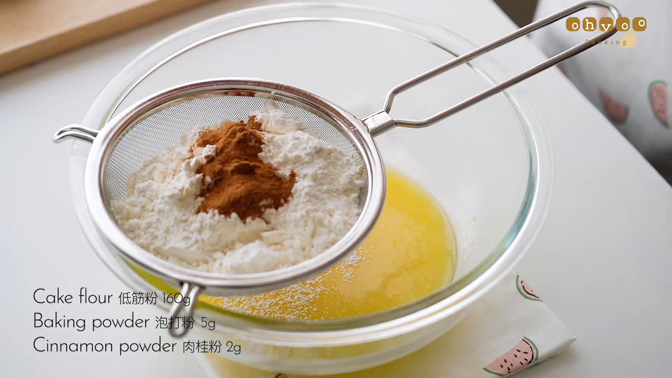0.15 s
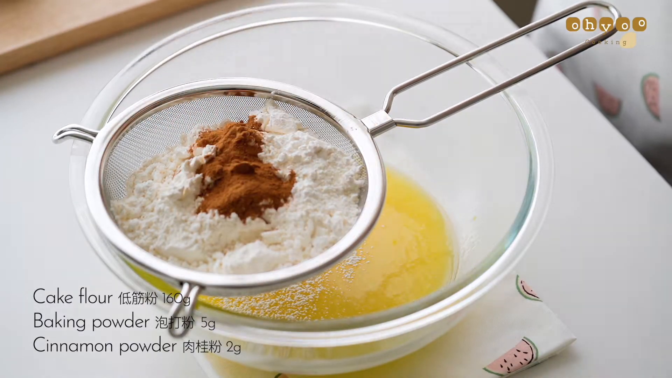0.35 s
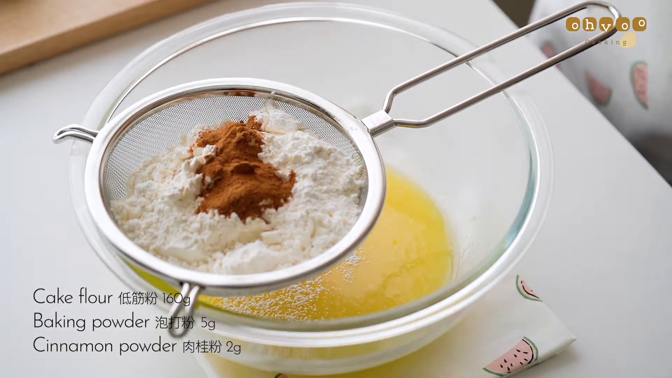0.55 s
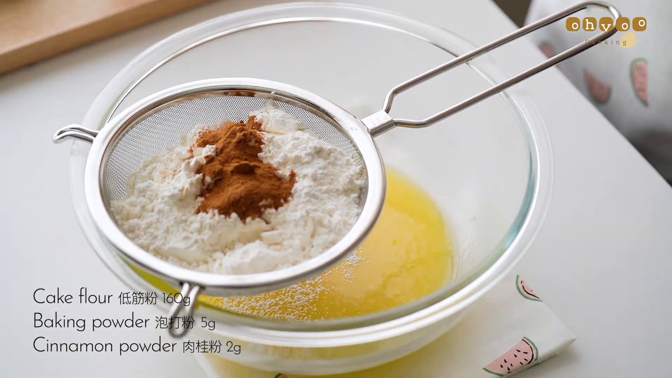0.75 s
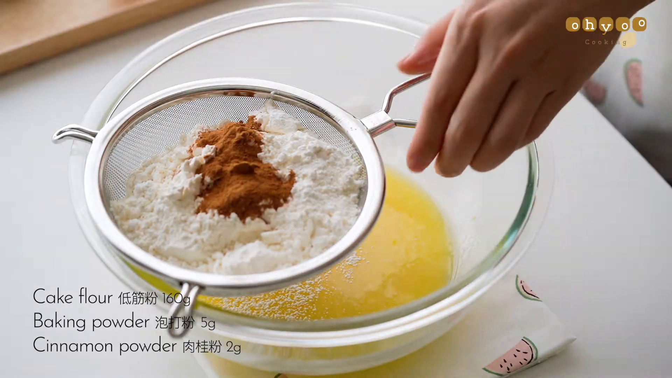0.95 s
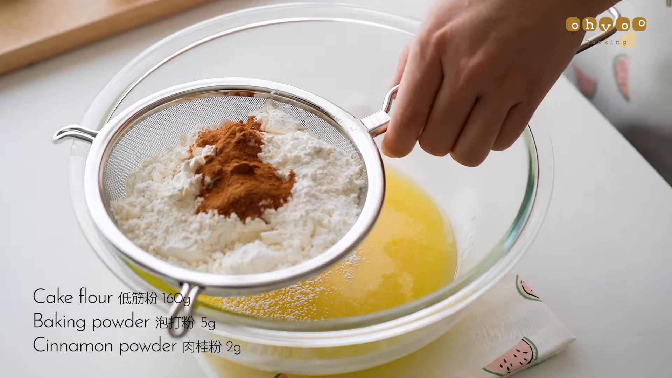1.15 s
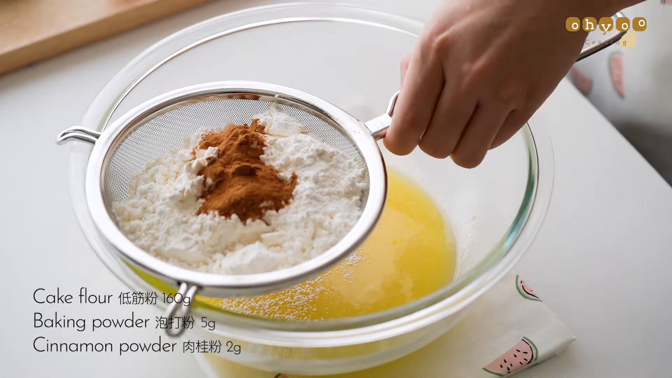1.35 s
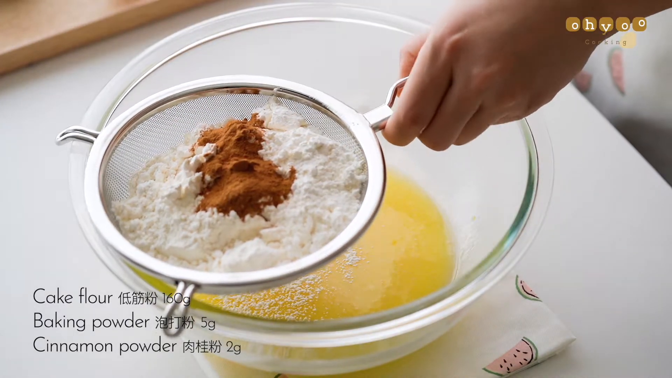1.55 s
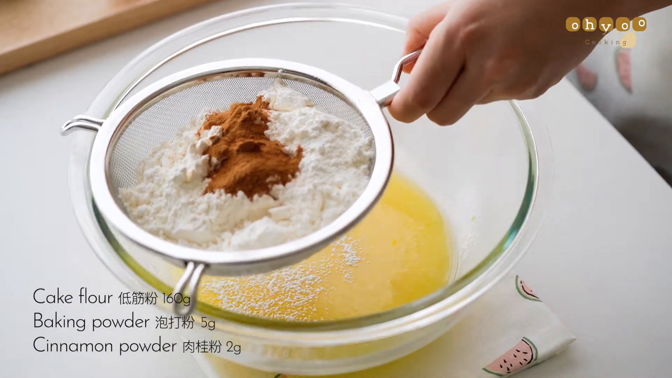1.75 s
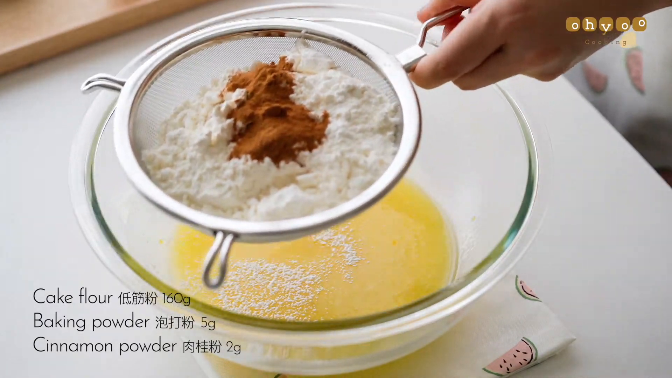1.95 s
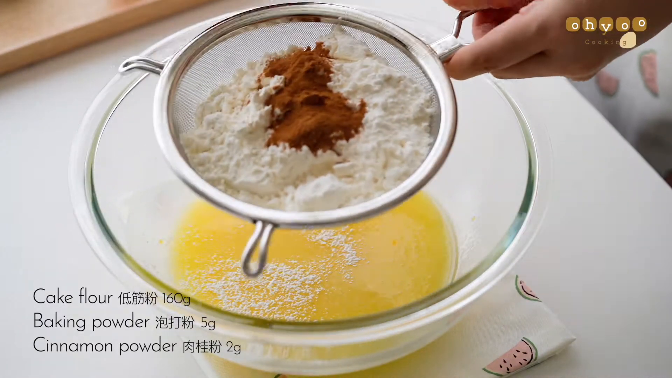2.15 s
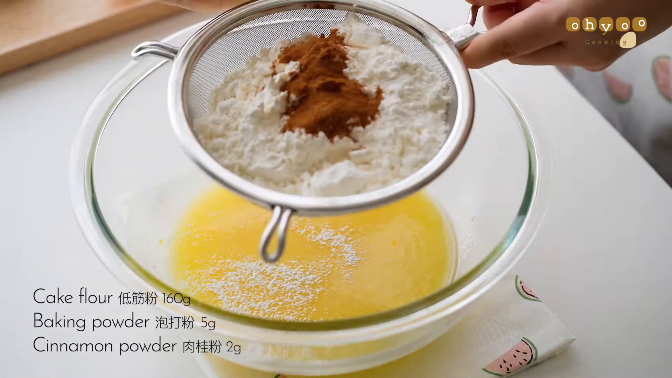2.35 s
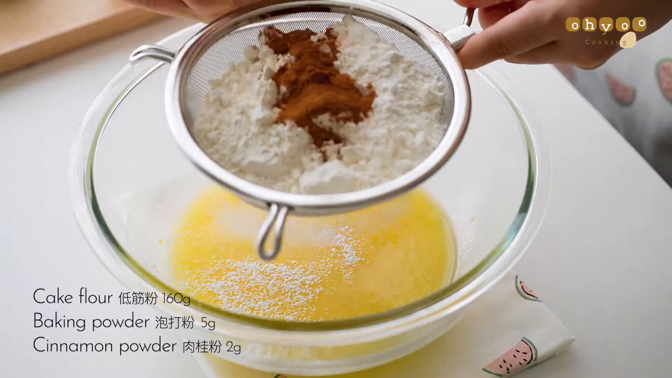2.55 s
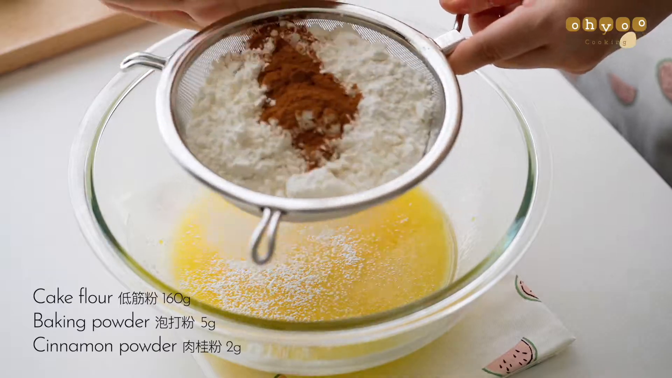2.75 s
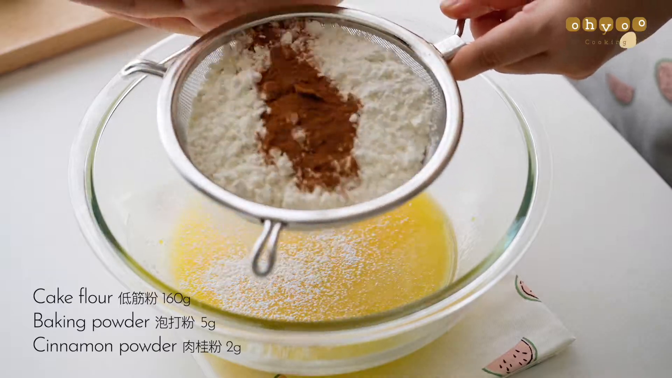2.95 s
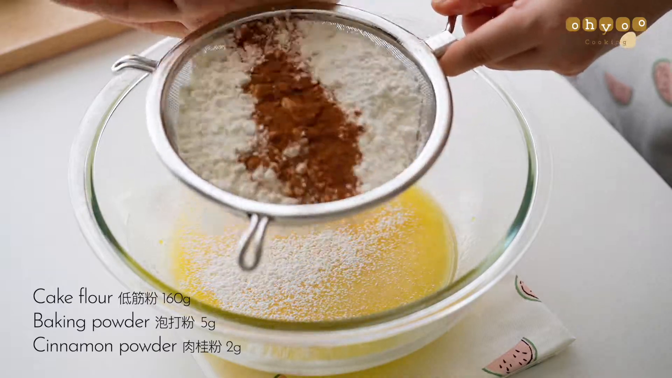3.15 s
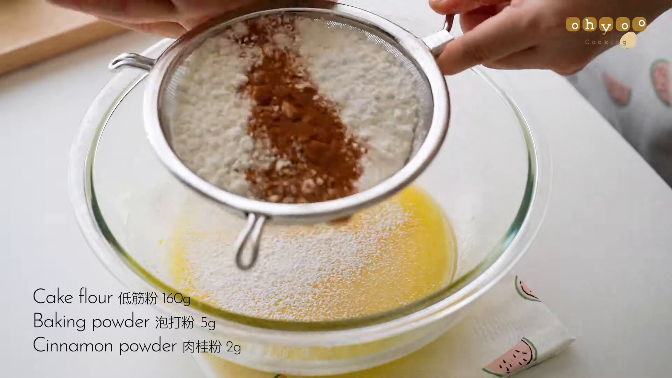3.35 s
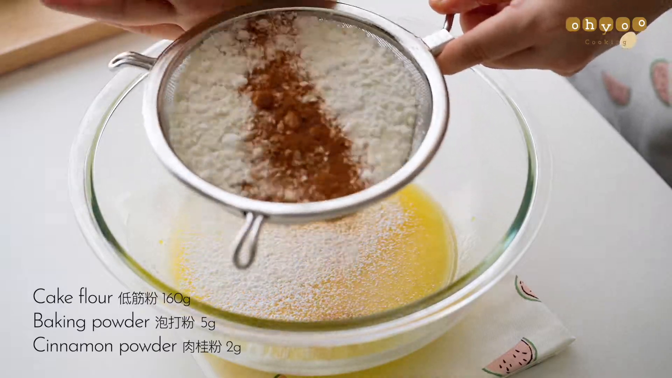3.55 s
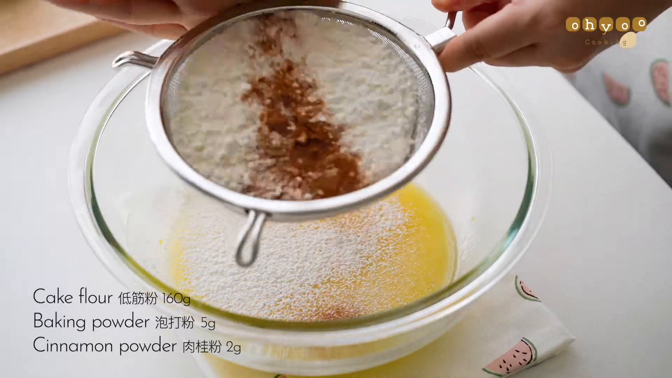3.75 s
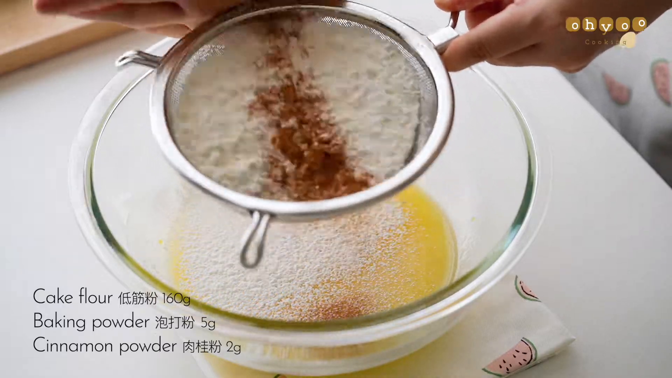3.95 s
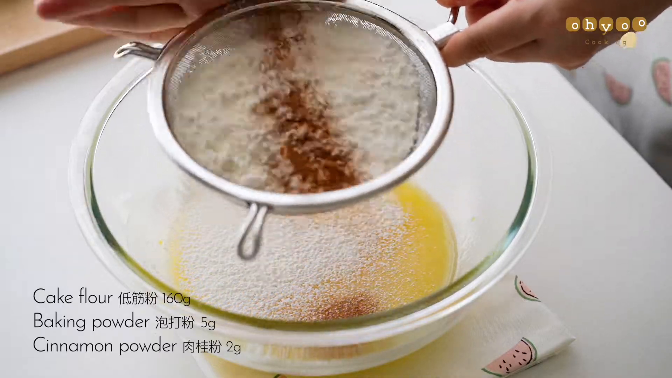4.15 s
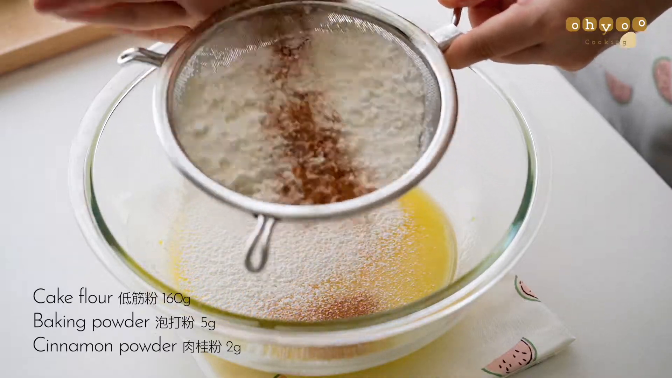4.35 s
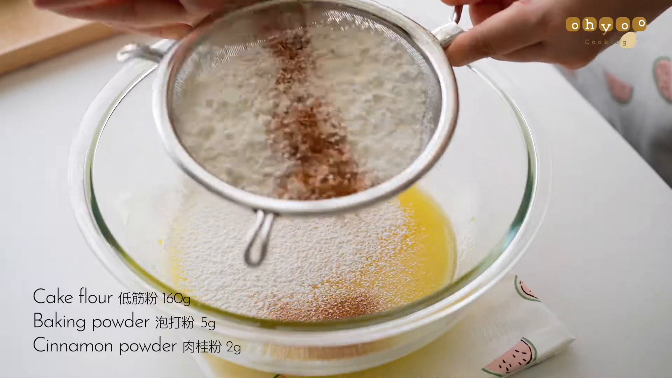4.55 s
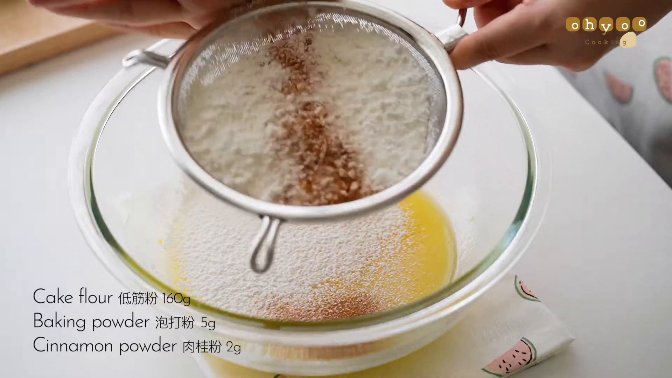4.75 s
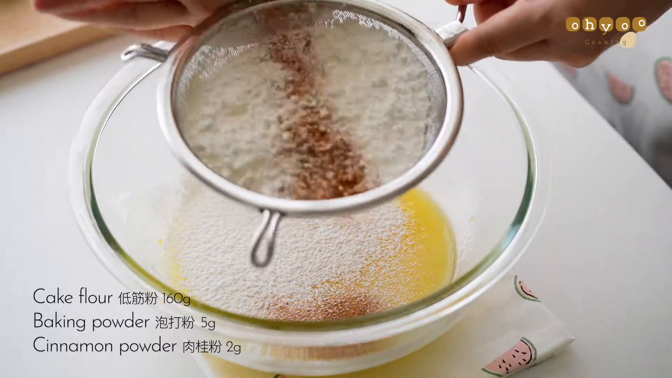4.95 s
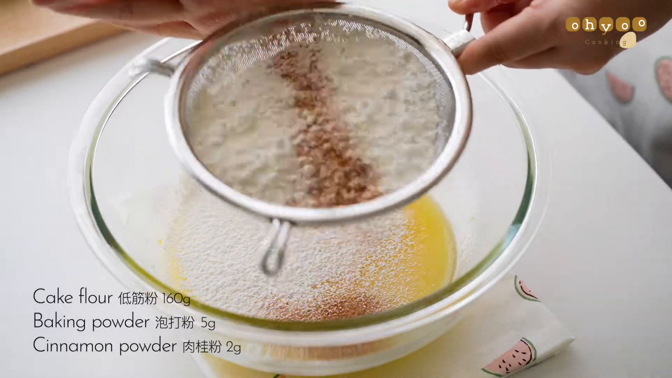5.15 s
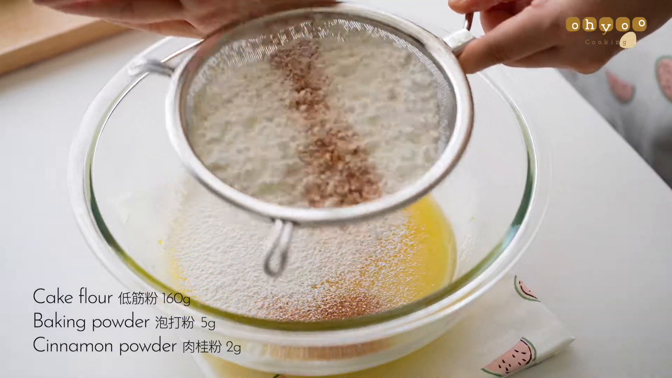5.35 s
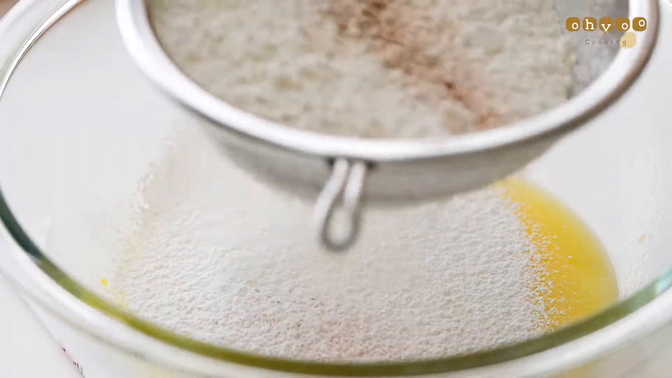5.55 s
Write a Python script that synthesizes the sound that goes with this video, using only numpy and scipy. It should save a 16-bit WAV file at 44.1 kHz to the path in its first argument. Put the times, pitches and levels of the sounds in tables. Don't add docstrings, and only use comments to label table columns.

```python
import sys
import numpy as np
from scipy import signal
from scipy.fft import rfft, irfft
from scipy.io import wavfile
from scipy.ndimage import uniform_filter1d

SR = 44100
rng = np.random.default_rng(int(sys.argv[2]) if len(sys.argv) > 2 else 0)


def rack_gain(trim_db):
    fader = np.asarray(trim_db, float)
    return 10 ** (fader / 20)


def persist_wave(psi):
    counts = np.round(np.clip(psi, -1, 1) * 32767).astype(np.int16)
    wavfile.write(sys.argv[1], SR, np.atleast_2d(counts).T)


N = 246959
T = np.arange(N) / SR

# [t/s, crack level/dB, rim ring level/dB, body knock level/dB, length/ms]
SLAPS = [(2.4663, -45, -73, -40.5, 3.2), (2.667, -48, -52, -45, 1.7), (2.8915, -44.5, -56, -40, 3.8),
         (3.093, -41.5, -45, -44.5, 9.5), (3.308, -40.5, -56, -59, 2.7), (3.5139, -44.5, -72, -41.5, 27),
         (3.7311, -39, -43, -44, 3), (3.9467, -33, -42, -41, 1.24), (4.1621, -41, -50, -35.5, 5.3),
         (4.3665, -46, -60, -46.5, 2.4), (4.5755, -38, -64, -32.5, 2.7), (4.7606, -50, -47, -42.5, 2.1),
         (4.967, -46.5, -58, -40, 2.8), (5.1805, -46, -63, -41.5, 5.2), (5.3847, -45, -60, -38.5, 15),
         (5.4255, -46, -53, -42.5, 3.3), (5.5463, -68, -51, -57, 2.7)]


def unit(x):
    return x / np.sqrt(np.mean(x ** 2))


def colour(x, points, lo_hz=0, hi_hz=SR):
    f = np.arange(1, len(x) // 2 + 2) * SR / len(x)
    hz, db = np.transpose(points)
    edges = 1 / (1 + (lo_hz / f) ** 6) / (1 + (f / hi_hz) ** 6)
    gain = rack_gain(np.interp(np.log(f), np.log(hz), db)) * edges
    return irfft(rfft(x) * gain, len(x))


def band(x, hz, q):
    return signal.lfilter(*signal.iirpeak(hz, q, SR), x)


def resonate(x, peaks):
    return sum(rack_gain(db) * unit(band(x, hz, hz / width)) for hz, width, db in peaks)


def walk(rate_hz):
    k = int(SR / rate_hz)
    held = np.repeat(rng.standard_normal(N // k + 1), k)[:N]
    return unit(uniform_filter1d(uniform_filter1d(held, k), k))


def add(out, s, x):
    i = int(s * SR)
    out[i:i + len(x)] += x[:max(N - i, 0)]


def decay(t60_s, t):
    return np.exp(-np.log(1000) * t / t60_s)


def ring(hz, t60_s, t):
    return np.sin(2 * np.pi * hz * t) * decay(t60_s, t)


def kitchen():
    # [t/s, appliance load/dB, nearness of moving hands/dB]
    room = [(0, 3.5, -2.5), (.22, -1, -2.5), (.41, 2, -4.5), (.46, 8, -0.5), (.585, 6.5, 0.5),
            (.61, 2.5, -4), (.97, -1.5, 3), (1.1, -2, -2), (1.4, 0.5, 3), (1.5, 6, 10), (1.558, -0.5, 4.5),
            (1.86, 1, -0.5), (2.1, -3, 2), (2.5, -2, -1), (3.5, 1.5, 1.5), (4.2, -2.5, 1.5), (4.7, 0.5, 1),
            (5.6, 1, 2.5)]
    # [f/Hz, level/dB per Hz]
    air_spectrum = [(15, -25.5), (25, -16), (80, -8.5), (145, 1.5), (223, 4), (277, -16.5), (317, -14.5),
                    (489, -21), (695, -30), (1190, -37.5), (1290, -32.5), (1650, -33.5), (4730, -41.5),
                    (7700, -55), (16000, -59)]
    # [f/Hz, level/dB per Hz]
    hiss_spectrum = [(4500, 0), (5500, -0.5), (7700, -0.5), (9500, -1), (11000, -9), (13000, -5.5),
                     (16000, -6.5)]
    # [f/Hz, width/Hz, level/dB]
    drone_peaks = [(172, 16, -3), (222, 11, 0), (260, 14, -4), (325, 25, -9)]
    # [f/Hz, width/Hz, level/dB]
    hum_peaks = [(79, 6, 0)]
    # [t/s, half length/s, level/dB]
    hum_swells = [
        (2.244, .2, 0),
        (3.122, 0.18, 4.5),
        (5.566, 0.15, 5.5),
    ]
    s, *columns = np.transpose(room)
    load_db, near_db = (np.interp(T, s, c) for c in columns)
    swell_db = sum(db * np.exp(-((T - at) / half) ** 2) for at, half, db in hum_swells)

    deep_db = -65 + 3.5 * walk(21)
    hum_db = -61 + .15 * load_db + swell_db + .89 * walk(12)
    drone_db = -57.5 + load_db + .7 * walk(14) + 1.7 * walk(22)
    air_db = -72 + near_db + .8 * walk(12) + 1.6 * walk(25.88)
    hiss_db = -78

    noise = rng.standard_normal((6, N))
    deep = unit(colour(noise[0], air_spectrum, hi_hz=59))
    hum_bed = unit(colour(noise[5], air_spectrum, lo_hz=60, hi_hz=130))
    hum = unit(resonate(noise[5], hum_peaks) + rack_gain(-3) * hum_bed)
    drone_bed = unit(colour(noise[1], air_spectrum, lo_hz=120, hi_hz=470))
    drone = unit(drone_bed + rack_gain(1.5) * unit(resonate(noise[2], drone_peaks)))
    drone = unit(colour(drone, [(380, 0), (480, -10), (700, -24), (1000, -50)]))
    air = unit(colour(noise[3], air_spectrum, lo_hz=467, hi_hz=4610))
    hiss = unit(colour(noise[4], hiss_spectrum, lo_hz=4650))
    low = deep * rack_gain(deep_db) + hum * rack_gain(hum_db) + drone * rack_gain(drone_db)
    return low + air * rack_gain(air_db) + hiss * rack_gain(hiss_db)


def cup_squeaks():
    # [f/Hz, level/dB]
    partials = [(1080, -3), (5090, -16), (8690, -5), (9630, -4.5), (12700, -10)]
    # [t/s, half length/ms, level/dB]
    squeezes = [
        (.05, 8, -74),
        (.066, 12, -74),
        (.17, 12, -84),
        (.207, 5.5, -73),
    ]
    out, t = np.zeros(N), T[:SR // 3]
    chance = rng.standard_normal((len(squeezes), len(partials)))
    for (s, half_ms, db), spot in zip(squeezes, chance):
        tones = sum(rack_gain(m_db + 2.5 * c) * np.sin(2 * np.pi * hz * t + c)
                    for (hz, m_db), c in zip(partials, spot))
        add(out, 0, rack_gain(db) * tones * np.exp(-((t - s) * 1000 / half_ms) ** 2))
    return out


def contacts():
    # [t/s, crack level/dB, rim
    # ring level/dB, body knock level/dB, length/ms]
    grips = [(0.248, -68, -53, -79, 3.8), (0.7785, -46.5, -54, -52, 1.03), (0.058, -76, -62, -72, 4),
             (0.853, -70, -57, -50, 3), (0.9272, -45.5, -51, -51, 2.1), (0.9957, -68.5, -46, -67, 2.7),
             (1.3124, -67, -63, -63, 3.6), (1.3468, -55.5, -49.5, -44, 24), (1.3715, -57, -51, -52, 3.5),
             (1.4868, -39.5, -42, -28.5, 3.3), (1.4969, -50, -52, -44, 1.1), (1.52, -51, -62, -48, 2.9),
             (1.5651, -59, -55, -36.5, 3.3), (1.904, -65, -79, -53.5, 2.4), (5.395, -44, -42, -43.5, 1.5)]
    # [t/s, crack level/dB, rim ring level/dB, body knock level/dB]
    rattles = [(2.743, -58, -61, -55), (4.022, -71, -62, -72), (2.949, -52, -55, -48.5),
               (2.957, -59, -53, -74), (3.5982, -69, -60, -55), (3.7074, -60, -69, -52),
               (3.774, -66, -59, -53), (3.9017, -46.5, -37, -35.5), (3.989, -49, -51, -54),
               (4.1256, -47.5, -41, -45), (4.202, -51, -49, -47.5), (4.229, -71, -49, -47.5),
               (4.337, -47.5, -52, -46), (4.35, -43, -46, -48), (4.514, -55, -68, -51),
               (4.815, -50, -67, -55), (4.9369, -52, -46.5, -49), (5.015, -54, -78, -57),
               (5.136, -39, -41, -42), (5.2514, -83, -72, -65), (5.3423, -43.5, -44, -46.5),
               (5.5777, -64, -52, -44)]
    rows = [(*r[:4], r[1] - 34, r[4]) for r in grips]
    for s, crack_db, rim_db, body_db, length_ms in SLAPS:
        sparkle_db = crack_db - 8 - 8 * (s - SLAPS[0][0])
        rows.append((s, crack_db, rim_db, body_db, sparkle_db, length_ms))
    return rows + [(*r, r[1] - 38, 2.6) for r in rattles]


def clicks():
    # [f/Hz, level/dB per Hz]
    crack_spectrum = [(1500, 0), (2400, 6), (4000, 5), (6500, 0.5), (8500, 0), (12000, -21), (16000, -7)]
    # [f/Hz, level/dB per Hz]
    thud_spectrum = [(300, 6.5), (500, 4.5), (900, -3), (1400, -29), (2500, -4.5), (4000, -30)]
    rim_hz, rim_t60_s = 1300, .027
    body_hz, body_t60_s = 700, .031
    gain_db, thud_db, thud_decay_s = -6.5, -9, .0075
    out, rings, t = np.zeros(N), np.zeros(N), T[:SR // 20]
    crack = unit(colour(rng.standard_normal(N), crack_spectrum, hi_hz=8000))
    sparkle = unit(colour(rng.standard_normal(N), crack_spectrum, lo_hz=9000))
    thud = unit(colour(rng.standard_normal(N), thud_spectrum))
    soft = 1 - np.exp(-(t / .00065) ** 2)
    for s, crack_db, rim_db, body_db, sparkle_db, length_ms in contacts():
        a, b = rng.standard_normal(2)
        i = int(s * SR)
        puff = soft * (np.exp(-(t * 1000 / max(length_ms, .3)) ** 2) + rack_gain(-20) * np.exp(-t / .015))
        puff_level = np.std(puff ** 2) ** .5 / 2
        smeared = uniform_filter1d(puff, size=420)
        for db, noise, shape in ((crack_db, crack, puff), (sparkle_db, sparkle, smeared)):
            skin = shape * np.resize(noise[i:], len(t))
            add(out, s, rack_gain(db + gain_db) * skin * puff_level / np.std(skin))
        knock = soft * np.exp(-t / thud_decay_s) * np.resize(thud[i:], len(t))
        add(out, s, rack_gain(body_db + thud_db) * knock)
        rim = sum(ring(rim_hz * (1 + .064 * c), rim_t60_s, t) for c in (a, b))
        add(rings, s, .57 * rack_gain(rim_db - 6) * soft * rim)
        body = ring(body_hz * (1 + .047 * b), body_t60_s, t)
        add(rings, s + .00082, -rack_gain(body_db - 5.5) * soft * body)
    return out + rings * (1 + .4 * walk(1200))


def rustle():
    # [t/s, half length/ms, centre f/Hz, level/dB,
    # nap level/dB]
    brushes = [(0.07, 40, 8800, -89, -100), (.47, 15, 4000, -80, -105), (0.524, 97, 240, -54, -110),
               (.945, 12, 260, -55.5, -110), (2.13, 90, 2800, -79.5, -110), (0.78, 0.96, 10500, -68, -70),
               (.83, 16, 9000, -78, -82), (0.899, 91, 1520, -78, -105), (1.005, 40, 7760, -79, -81),
               (1.004, 16, 1440, -78, -105), (1.13, 20, 9000, -82, -80), (1.183, 24, 7550, -80, -78),
               (1.2368, 1.2, 9400, -64, -80), (1.259, 22, 9100, -80, -100), (1.411, 140, 8450, -77.5, -78),
               (1.54, 38, 8300, -77, -78), (1.62, 48, 8100, -75.5, -80), (1.729, 51, 7200, -77.5, -82),
               (1.831, 14, 7200, -78, -100), (1.92, 15, 7450, -81, -100), (1.99, 22, 7060, -73, -95),
               (2.14, 33, 8000, -76, -80), (2.189, 48, 6700, -79, -99), (2.83, 49, 9500, -83, -87),
               (3.05, 45, 9400, -78, -95), (5.11, 25, 6500, -79, -100), (5.32, 25, 8000, -80, -100)]
    nap_hz, spread, half_span_s = 15400, 1.11, .2
    out = np.zeros(N)
    u = np.arange(-SR // 5, SR // 5) / SR
    strokes = [r[:4] for r in brushes] + [(*r[:2], nap_hz, r[4]) for r in brushes]
    for s, half_ms, hz, db in strokes:
        noise = rng.standard_normal(len(u))
        hiss = unit(colour(noise, [(20, 0), (SR, 0)], lo_hz=hz / spread, hi_hz=hz * spread))
        patch = rack_gain(db) * hiss * np.exp(-np.abs(u * 1000 / half_ms) ** 3)
        start = max(int((half_span_s - s) * SR), 0)
        add(out, max(s - half_span_s, 0), patch[start:])
    return out * rack_gain(1.5 * walk(130) + 1.9 * walk(900))


def pings():
    # [t/s, level/dB, f/Hz, t60/ms]
    lift_pings = [(.248, -63, 1180, 28), (.853, -62, 1900, 15), (.9275, -54, 2400, 14),
                  (.9275, -53, 4200, 12), (.955, -64, 1450, 20), (.989, -59, 1390, 22),
                  (.997, -61, 2800, 16), (1.013, -61, 1400, 25), (1.178, -62, 540, 60),
                  (1.184, -68, 5900, 70), (1.235, -61, 9300, 23), (1.254, -59, 820, 25),
                  (1.257, -70, 2670, 52), (1.313, -66, 3350, 30), (1.314, -65, 2500, 50),
                  (1.347, -49, 813, 23), (1.372, -50, 3150, 20), (1.372, -61, 6000, 20),
                  (1.372, -62, 8500, 20), (1.425, -66, 2500, 60), (1.455, -67, 2660, 90),
                  (1.487, -36, 1140, 22), (1.488, -46, 2080, 20), (1.488, -48, 3050, 16),
                  (1.488, -50, 6300, 18), (1.488, -45, 1600, 18), (1.498, -43, 1070, 23),
                  (1.499, -42, 500, 27), (1.514, -56, 3900, 18), (1.515, -53, 690, 130),
                  (1.516, -60, 5520, 40), (1.52, -59, 4400, 20), (1.5655, -44, 1030, 20),
                  (1.566, -40, 660, 24), (1.566, -46, 430, 26), (1.566, -57, 2300, 16),
                  (1.566, -55, 3200, 20), (1.575, -51, 700, 40), (1.592, -65, 2490, 90),
                  (1.6, -67, 1350, 100)]
    # [t/s, level/dB, f/Hz, t60/ms]
    tap_pings = [(3.308, -43, 6100, 16), (3.307, -52, 2620, 16), (3.598, -54.5, 1690, 18),
                 (2.467, -50, 5900, 20), (2.892, -50, 3780, 24), (2.95, -54, 6200, 24),
                 (2.957, -63, 6100, 18), (2.972, -63, 1900, 25), (3.076, -63, 1460, 33),
                 (3.094, -52, 6000, 16), (3.707, -60, 1700, 16), (3.731, -46, 6060, 18),
                 (3.769, -55, 1000, 25), (3.902, -45, 4150, 13), (3.901, -55, 5600, 12),
                 (3.948, -44, 710, 20), (3.515, -42.5, 710, 25), (4.137, -56, 1200, 20),
                 (3.901, -58, 7040, 15), (3.935, -59, 3420, 14), (3.946, -42.5, 2590, 18),
                 (3.988, -61, 5170, 15), (4.023, -59, 2400, 18), (4.203, -51.5, 2520, 18),
                 (4.337, -57, 3320, 20), (4.349, -53, 2210, 26), (4.38, -44, 5330, 22),
                 (4.515, -59, 3660, 25), (4.576, -43, 2500, 20), (4.577, -41, 3940, 17),
                 (4.606, -60, 1290, 35), (4.905, -69, 1340, 30), (5.015, -58, 6400, 22),
                 (5.137, -43.5, 3710, 22), (5.137, -41, 5750, 18), (5.136, -56, 7300, 12),
                 (5.154, -57, 1380, 33), (5.156, -63, 3200, 15), (5.197, -41.5, 5190, 21),
                 (5.251, -66, 2050, 18)]
    out, t = np.zeros(N), T[:SR // 10]
    for s, db, hz, t60_ms in lift_pings + tap_pings:
        pair = ring(hz, t60_ms / 1000, t) + .6 * ring(hz * 1.045, t60_ms / 1000, t)
        add(out, s, rack_gain(db) * pair * (1 - np.exp(-(t / .00087) ** 2)))
    return out


def counter():
    # [t/s, level/dB, f/Hz, t60/s]
    knocks = [
        (0.995, -40.5, 54, 0.55),
        (1.3, -35.5, 57, 0.18),
        (1.6, -52, 72, 0.11),
        (1.6, -44.5, 203, 0.089),
        (0.68, -41, 154, 0.015),
    ]
    out, t = np.zeros(N), T[:SR // 2]
    for s, db, hz, t60_s in knocks:
        add(out, s, rack_gain(db) * ring(hz, t60_s, t) * (1 - np.exp(-t * hz / .28)))
    return out


def bowl():
    # [f/Hz, level/dB, t60/s]
    modes = [(484, -6, .13), (1340, -11, .23), (2482, -4, .13), (2660, -17, .1), (3607, -18, .11),
             (3953, 1, .07), (3925, -22, .25), (4390, -12, .03), (5529, -8, .09), (5965, -22, .08),
             (7354, -32, .1), (8586, -30, .06), (9168, -24, .1)]
    # [t/s, level/dB]
    strikes = [
        (.997, -72),
        (1.185, -80),
        (1.26, -78),
        (1.374, -66),
        (1.491, -47),
        (1.518, -62),
        (1.615, -70),
    ]
    # [t/s, level/dB]
    rub = [(1.05, -97), (1.19, -81), (1.24, -83), (1.4, -80), (1.55, -77), (1.63, -79), (1.7, -95)]
    out, t = np.zeros(N), T[:SR // 2]
    chance = rng.standard_normal((len(strikes), len(modes)))
    for (s, db), spot in zip(strikes, chance):
        add(out, s, sum(rack_gain(db + m_db + 1.5 * c) * ring(hz, t60_s, t)
                        for (hz, m_db, t60_s), c in zip(modes, spot)))
    out *= 1 + .12 * walk(120)
    peaks = [(hz, 30, db / 2) for hz, db, _ in modes[1:4]] + [(5470, 60, -11)]
    singing = unit(resonate(rng.standard_normal(N), peaks))
    rub_db = np.interp(T, *np.transpose(rub), left=-140, right=-140)
    return out + singing * rack_gain(rub_db + 2 * walk(25))


def thumps():
    # [crest t/s, swing level/dB, slowness/1, handle shiver f/Hz, shiver level/dB re swing]
    blows = [(2.4753, -36, 1.12, 110, -7), (2.6779, -32.5, .99, 143, -9), (2.9002, -31, 1.0, 114, -3.5),
             (3.1022, -32, 1.02, 127, -2.5), (3.3161, -32, 1.02, 136, .5), (3.5228, -33.5, 1.03, 138, -2.5),
             (3.7387, -33.5, 1.02, 133, 1), (3.9564, -37, .97, 140, -3.5), (4.1696, -35.5, 1.0, 131, 3),
             (4.375, -34, .86, 131, -4.5), (4.5826, -34.5, .9, 137, 0), (4.7799, -39, .97, 141, -11),
             (4.976, -37, .8, 150, -4), (5.1908, -37, .8, 150, -6), (5.394, -35.5, .9, 140, -3),
             (5.436, -37.5, .97, 172, -6)]
    crest_s, first_s, bend, rise_s, fall_s = .006, .0031, .572, .0075, .0154
    change_s = 5.396
    out, t = np.zeros(N), T[:SR // 10]
    for s, db, slow, hz, shiver_db in blows:
        u = t / slow
        swing = -np.sin(np.pi * (u / first_s) ** bend)
        swing *= (1 - np.exp(-(u / rise_s) ** 2)) * np.exp(-u / fall_s - (u / .066) ** 2)
        shiver = np.cos(2 * np.pi * hz * (t - crest_s * slow))
        shiver *= (1 - np.exp(-(t * 1000) ** 2)) * decay(.065, t)
        blow = swing / swing.max() + rack_gain(shiver_db) * shiver
        at = s - crest_s * slow
        if at < change_s < at + .03:
            blow = blow * (at + t < change_s)
        add(out, at, rack_gain(db) * blow)
    return out


def flour():
    # [densest t/s, level/dB, half length/ms, brightness/dB, trickle level/dB]
    throws = [(2.487, -64.5, 9.2, 10, -26), (2.684, -53, 15, 6, -34), (2.911, -47.5, 12, 2.5, -39),
              (3.114, -47.5, 9.9, 1.5, -42), (3.326, -49, 16.6, 3, -25), (3.534, -51, 11, 3.5, -16),
              (3.748, -47.5, 11.4, 2, -12), (3.967, -51, 17.7, -1.5, -27), (4.178, -50.5, 11, 2, -23),
              (4.379, -51.5, 17, 5.5, -25), (4.591, -52, 9.3, 3, -13), (4.783, -54, 16.6, 8.5, -11.5),
              (4.982, -53.5, 10.7, 4, -10), (5.197, -50.5, 12.6, 5, -23), (5.4, -55, 9.6, 5, -11),
              (5.447, -40, 8.5, 3.5, -43), (5.595, -50, 30, 1.5, -35)]
    # [rim level/dB, middle f/Hz, middle level/dB, fine f/Hz, fine level/dB]
    zones = [(-79, 3690, -77, 5450, -76), (-69, 3960, -62, 6040, -64), (-58, 3810, -59, 5340, -63),
             (-59, 3210, -56, 6300, -65), (-62, 3460, -61, 5290, -62), (-66, 3900, -60, 5250, -65),
             (-61, 3790, -60, 5260, -57), (-61, 3180, -62, 5380, -63), (-65, 3810, -61, 5120, -63),
             (-61, 3800, -58, 6210, -60), (-65, 3990, -61, 5210, -68), (-65, 3640, -62, 6150, -60),
             (-63, 3650, -63, 6220, -63), (-62, 3890, -58, 5840, -59), (-60, 3800, -67, 6430, -69),
             (-57, 3560, -52, 6430, -55), (-60, 3750, -64, 6400, -70)]
    # [t/s, extra level/dB]
    clumps = [(2.696, 2), (2.903, -1), (2.917, 0), (3.104, 0), (3.118, 0.5), (3.123, -0.5), (3.332, 2.5),
              (3.352, 8), (3.534, 2), (3.541, 2), (3.746, 6), (3.752, 1), (3.772, 6), (3.957, 4),
              (3.964, 11.5), (3.972, 1), (4.178, 3), (4.372, 3), (4.383, 0.5), (4.592, 5), (4.598, 3),
              (4.781, 3.5), (4.788, 4.5), (4.813, 11), (4.985, 2.5), (5.196, 5.5), (5.211, 4), (5.432, -3),
              (5.447, 1.5), (5.455, 3)]
    # [f/Hz, level/dB per Hz]
    mesh_spectrum = [(290, 5), (500, 0.5), (1280, -4.5), (1710, -11), (2360, -7), (2970, -6), (3540, 0.5),
                     (4270, -6), (5230, -7.5), (6320, -6.5), (9900, -25.5), (15100, -35.5), (16000, -24)]
    zone_rim_hz, zone_width_hz, zone_trim_db = 1240, (170, 450, 440), (-2.5, .4, -.1)
    zone_trickle = .63
    clump_ms, split_hz, trickle_s = 1.4, 4800, .032
    uneven_hz = (700, 1700, 2500, 4400, 7200, 9500)

    flow, bright, singing, clump_db = np.zeros((4, N))
    size = np.minimum(rng.exponential(size=N), 4.5)
    grains = unit(rng.standard_normal((3, N)) * rack_gain(3.5 * size)) * rack_gain(1.8 * walk(250))
    span = T[:SR // 50] - .01
    for s, db in clumps:
        add(clump_db, s + span[0], db * np.exp(-(span * 1000 / clump_ms) ** 2))
    grains = grains * rack_gain(clump_db)

    for (s, db, half_ms, bright_db, trickle_db), slap, zone in zip(throws, SLAPS, zones):
        slap_s = slap[0]
        near = slice(int((min(slap_s, s - .04) - .01) * SR), int((s + .1) * SR))
        u = T[near] - s
        steeper = np.where(u > 0, 1.06, 1)
        throw = np.exp(-np.abs(u * 830 / half_ms * steeper) ** 2.37)
        trickle = rack_gain(trickle_db) * (u > 0) * np.exp(-(u / trickle_s) ** 2)
        landed = np.clip((T[near] - slap_s) / .0017, 0, 1)
        hump = landed * (throw + trickle)
        sung = landed * (throw + zone_trickle * trickle)
        flow[near] += rack_gain(db) * hump
        bright[near] += rack_gain(db + bright_db) * hump
        rim_db, mid_hz, mid_db, fine_hz, fine_db = zone
        zone_db = np.add((rim_db, mid_db, fine_db), zone_trim_db)
        for hz, level_db, width in zip((zone_rim_hz, mid_hz, fine_hz), zone_db, zone_width_hz):
            wires = band(band(grains[2, near], hz, hz / width), hz, hz / width) * sung
            singing[near] += rack_gain(level_db) * wires * np.sqrt(np.sum(sung ** 2) / np.sum(wires ** 2))

    out = singing
    edges = (dict(lo_hz=346, hi_hz=split_hz), dict(lo_hz=split_hz))
    for grain, rate, edge in zip(grains, (flow, bright), edges):
        mesh = colour(grain * rate, mesh_spectrum) / np.std(colour(grain, mesh_spectrum))
        mesh = mesh + sum((rack_gain(2 * walk(14)) - 1) * band(mesh, hz, 4) for hz in uneven_hz)
        out = out + rack_gain(-2.5) * colour(mesh, [(20, 0), (SR, 0)], **edge)
    return out


def tiles(near):
    t = T[:SR // 4]
    tail = unit(rng.standard_normal(len(t))) * decay(.11, t) * (t > .004)
    return rack_gain(-36.5) * signal.fftconvolve(near, tail)[:N]


def scene():
    near = cup_squeaks() + clicks() + pings() + counter() + bowl() + flour()
    return (kitchen() + near + tiles(near) + rustle() + thumps())[None]


def roll_off(x):
    return signal.sosfilt(signal.butter(12, 16000, fs=SR, output="sos"), x)


def record(dry):
    top_cut = signal.ellip(8, .2, 60, 15800, fs=SR, output="sos")
    mix = signal.sosfilt(top_cut, dry) + .0005
    return roll_off(mix)


dry = scene()
out = record(dry)
persist_wave(out)
```